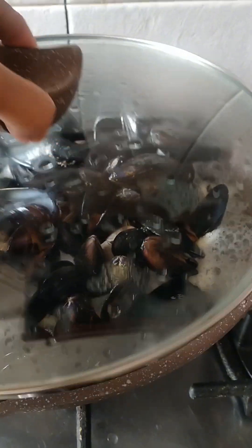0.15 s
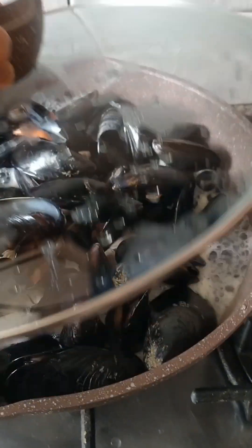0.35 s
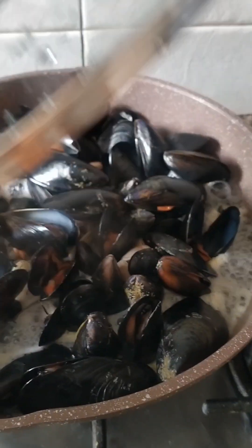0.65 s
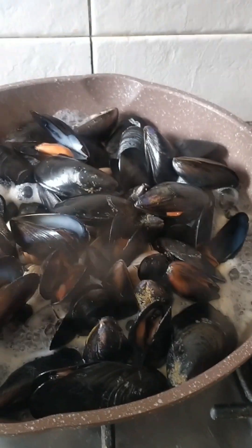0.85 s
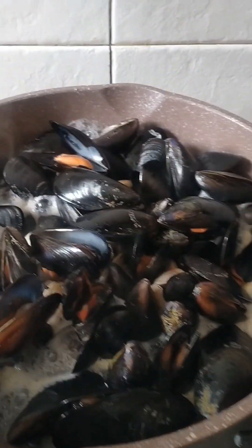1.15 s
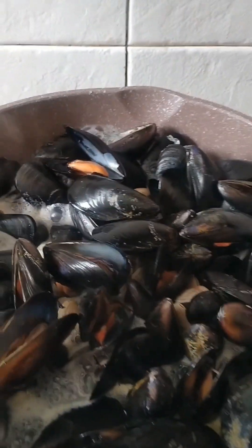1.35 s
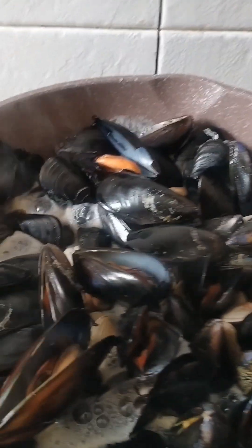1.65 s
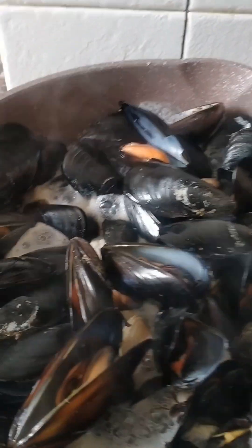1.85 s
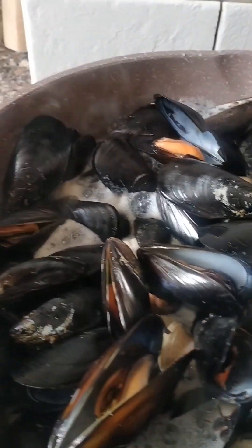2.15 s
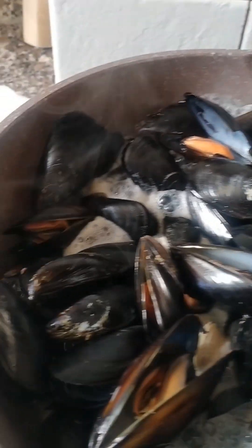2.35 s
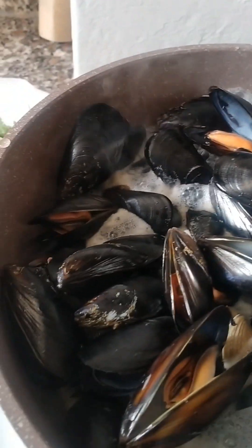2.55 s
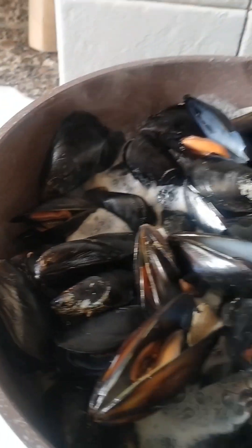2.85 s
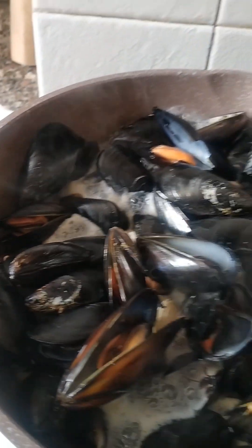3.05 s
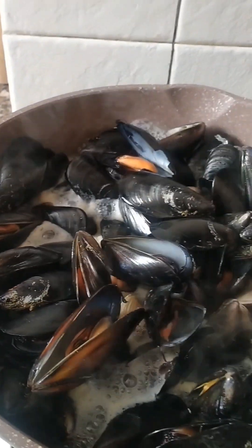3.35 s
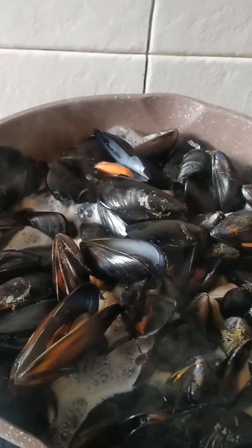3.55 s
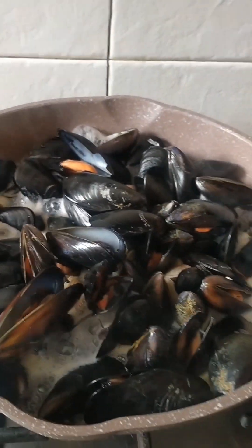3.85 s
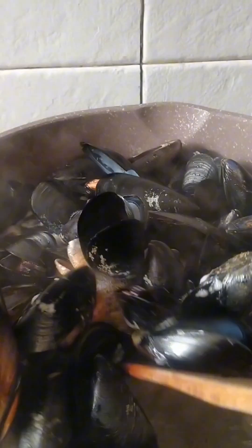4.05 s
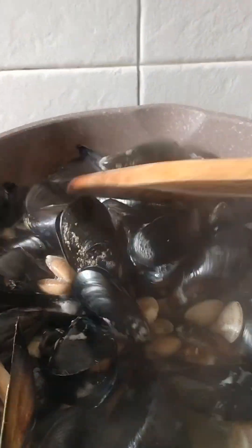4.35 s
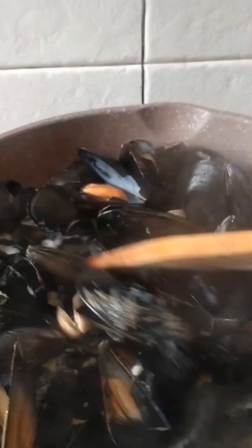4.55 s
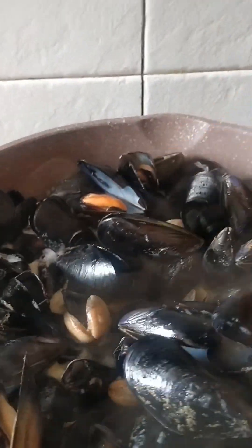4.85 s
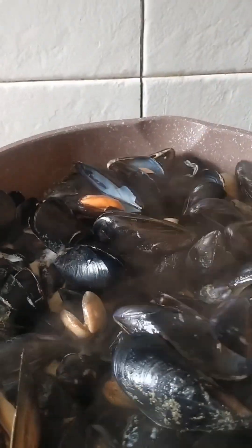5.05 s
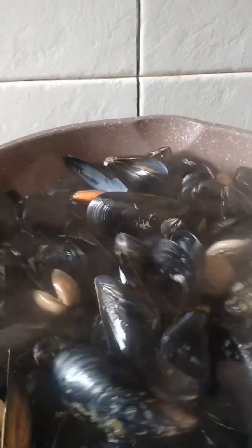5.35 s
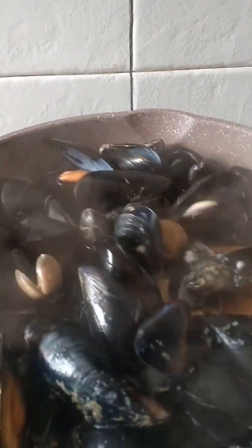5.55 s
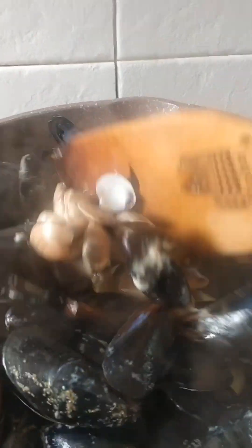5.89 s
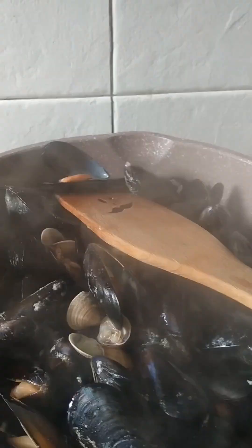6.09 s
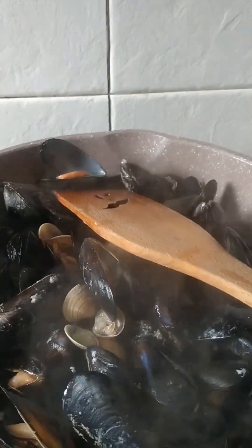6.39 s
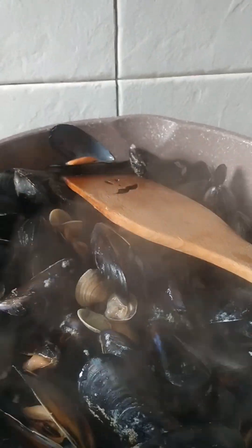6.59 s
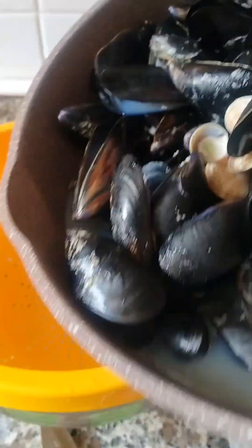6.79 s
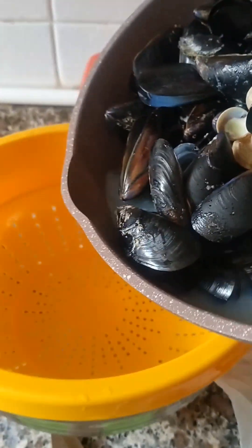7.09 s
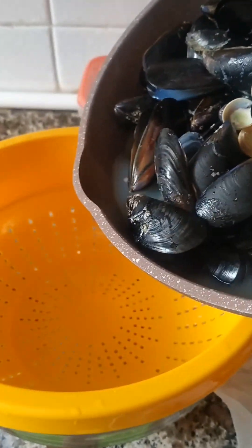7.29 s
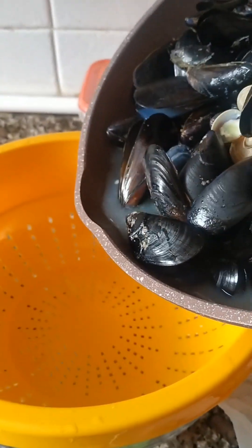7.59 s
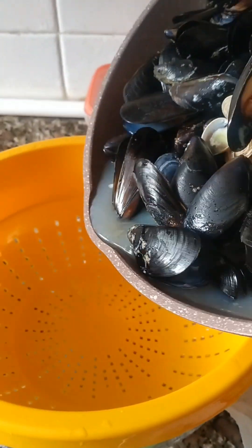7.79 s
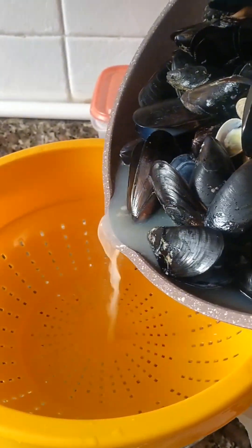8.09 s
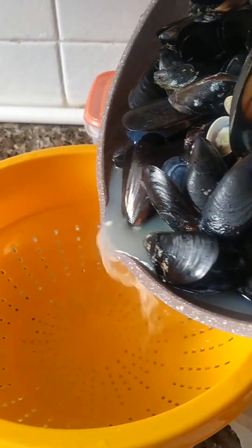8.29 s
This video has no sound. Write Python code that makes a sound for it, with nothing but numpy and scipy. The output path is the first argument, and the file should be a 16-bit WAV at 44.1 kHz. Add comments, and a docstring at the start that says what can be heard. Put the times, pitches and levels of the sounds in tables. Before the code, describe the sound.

Over a faint stove hiss, a glass lid knocks, then mussel shells clatter loudly under a spatula before a quieter pan-tilt with trickling broth.

```python
"""Over a gas flame with thin steam whistles, a lid knocks and its struck glass rings on. A spatula then turns
the shellfish in the pan: noisy blows shake a bank of short shell resonances. Abruptly the scene changes: a
quieter passage follows over room tone, then the worktop, where the pan is tilted over a colander: shells slide
and tick, the pan knocks, two thin squeaks pass, and the first broth dribbles out as ringing bubbles and
pattering drops. Noise echoes stand for the tiled kitchen."""
import sys
import numpy as np
from scipy import signal
from scipy.fft import rfft, irfft, next_fast_len
from scipy.io import wavfile

SR = 44100
rng = np.random.default_rng(int(sys.argv[2]) if len(sys.argv) > 2 else 0)


def bounce(signal):
    """Save signal as a 16-bit WAV file at the path given by the first command-line argument."""
    frames = np.transpose(np.atleast_2d(signal))
    limited = np.clip(frames, -1, 1)
    pcm = np.round(limited * 32767).astype(np.int16)
    wavfile.write(sys.argv[1], SR, pcm)


N = 371763

JUMP_S = 6.12   # the scene changes: the part with the flame ends and the quieter part begins
KITCHEN_T60_S, WALL_CUT_HZ = .24, 5000
CUTOFF_HZ = 16984   # everything above is removed
EDGE_DB = -16.5   # a slide's level at both ends of its swell and fade, relative to its loudest
LOOSENED_DB, SETTLE_S = -26.5, .25   # a blow leaves its neighbours rattling: level under the blow, t60

# The stove's background layers: start_s, gas_hiss_db, room_rumble_db, handling_rumble_db
STOVE_LEVELS = [(0.15, -54.5, -55.5, -77), (0.6, -53.5, -56, -94), (2.5, -53.5, -56, -82),
                (2.75, -52.5, -51, -73), (3.2, -53, -56.5, -59.5), (3.45, -53.5, -49, -52),
                (3.7, -54, -55.5, -65.5), (4.0, -54.5, -57, -63.5), (4.81, -65, -57, -84)]
# Spectrum of the gas hiss: frequency_hz, density_db (per Hz, relative)
HISS_SPECTRUM = [(350, -22), (600, -13), (1680, 6), (2980, -7.5), (7800, -9.5), (10200, -13), (10900, -7.5),
                 (15000, 1.5), (16100, 11), (16800, -57.5)]
# Burner resonances in the hiss: frequency_hz, width_hz, boost_db
BURNER_PEAKS = [(1686, 36, 6), (3620, 160, 8.5), (5770, 540, 5), (7640, 680, 6), (11130, 330, 11)]
# Steam whistles: pitch_hz, level_db (over the hiss)
STEAM_WHISTLES = [(1850, -15.5), (5040, -18), (8650, -27), (13500, -14.5), (14900, -9), (15400, -10.5)]
# Spectrum of the room: frequency_hz, density_db (per Hz, relative)
ROOM_SPECTRUM = [(12, -47.5), (20, -2.5), (75, -7.5), (125, -1), (252, -13.5), (299, -10), (325, -11.5),
                 (848, -16), (1330, -19), (2690, -23.5), (5440, -43.5), (15000, -37.5), (16800, -54)]
# Room tone once the hiss has stopped: start_s, level_db
QUIET_ROOM_LEVELS = [(6.2, -63.5), (6.5, -64), (6.6, -60), (7.3, -59.5), (8.43, -56.5)]
# Broth dribbling through the holes: start_s, gurgle_db
BROTH_LEVELS = [(7.99, -92), (8.03, -61.5), (8.43, -59)]
# Thin squeaks: start_s, length_s, pitch_hz, level_db
SQUEAK_EVENTS = [(7.53, .08, 11600, -58), (7.63, .08, 13200, -57)]
# Things knocked: start_s, thud_db, thud_hz, then over the thud clank_db, crack_db, ring_db; body whose modes
# ring (lid or pan); the two 100 Hz rows are low bumps as the pan is handled
KNOCK_EVENTS = [(0.059, -25.5, 405, -6.5, -31, -20, "lid"), (0.191, -59, 330, 7, 7, 9, "lid"),
                (1.348, -54, 890, 18.5, -10, -2, "lid"), (2.681, -35, 465, 1.5, -3.5, -11, "lid"),
                (3.159, -38, 294, -16, -4, -20, "lid"), (3.392, -19.5, 524, -7, -41, -24, "lid"),
                (3.561, -32, 312, -2.5, -39, -28, "lid"), (4.8425, -23.5, 517, 1, -22, 0.5, "pan"),
                (6.552, -43, 100, -30, -32, -33, "pan"), (6.893, -43, 100, -11, -23, -30, "pan"),
                (7.452, -34, 354, 1.5, -38.5, -31, "pan"), (8.018, -34.5, 443, -9, -21, -33, "pan"),
                (8.056, -33, 432, -4.5, -34, -28, "pan")]
# Ringing modes of the glass lid: pitch_hz, level_db, t60_s
LID_MODES = [(2070, 1, 0.11), (2420, -0.5, 0.17), (3000, -8.5, 0.15), (3600, -20, 0.18)]
# Ringing modes of the pan: pitch_hz, level_db, t60_s
PAN_MODES = [(178, -19, .4), (1394, -1, .11), (1992, -3, .06), (2110, -9, .1), (2450, -7, .1),
             (2650, -9, .07), (3305, -2, .15), (3672, -6, .15)]
# The heap shifts under spatula or tilt: loudest_s, swell_s, fade_s, level_db, treble_db (over shell colour)
HEAP_SLIDES = [(4.048, 0.0057, 0.29, -30, -4.5), (4.25, 0.072, 0.046, -27.5, -2.5),
               (4.411, 0.16, 0.15, -19.5, -3), (4.571, 0.041, 0.1, -20, -4),
               (4.965, 0.055, .12, -19.5, -3.5), (5.2, 0.12, 0.13, -28, -7), (5.39, 0.33, 0.18, -24, -10),
               (5.7, 0.19, 0.35, -31.5, -11), (5.938, 0.17, 0.15, -22, 1.5),
               (6.719, 0.081, 0.13, -44, -2.5), (7.2, 0.11, 0.1, -53, -3.5), (7.57, 0.12, 0.15, -40.5, -1),
               (7.84, 0.16, 0.14, -34.5, -2.5), (8.4, 0.53, 0.28, -53.5, 4.5)]
# Shell on shell blows: start_s, strike_db, loudest_pitch_hz, treble_db (over shell colour)
SHELL_BLOWS = [(4.0437, -17, 2750, 7), (4.1245, -17, 2710, 9), (4.136, -12.5, 3160, 2),
               (4.1431, -13, 1360, 5), (4.1958, -19, 2760, 9), (4.2231, -10.5, 2760, 0),
               (4.3035, -7.5, 2720, 4.5), (4.3426, -8.5, 2670, -1), (4.3974, -17, 2590, -10),
               (4.4586, -5, 7640, -3), (4.5326, -11, 2600, 0), (4.5522, -7, 2620, -13),
               (4.6868, -10, 2980, 9.5), (4.8426, -5, 3200, -7), (4.9373, -5.5, 5810, -3),
               (4.9488, -19, 3030, 16), (4.96, -23, 2630, -6), (4.9911, -10, 3060, -17),
               (5.035, -9, 2900, 2), (5.1143, -17.5, 2550, 7), (5.2497, -26, 2540, 13),
               (5.2651, -14, 2700, -2), (5.6268, -16, 2430, -29), (5.6424, -20.5, 3060, -16),
               (5.6689, -14, 2530, -11), (5.7474, -18, 2500, 1), (5.7593, -16.5, 2710, -7),
               (5.8135, -8, 2820, -2), (5.865, -9.5, 4920, -1), (5.8837, -15, 2820, -2),
               (5.9555, -7, 3770, -6), (6.0355, -11.5, 3200, 2), (6.0643, -13, 2260, -2),
               (6.6472, -38, 3020, -6), (7.0565, -44.5, 2430, 0), (7.0994, -50, 1540, 3),
               (7.1464, -47.5, 2920, 0), (7.4954, -35, 2320, -13), (7.5599, -26.5, 1470, 9),
               (7.6953, -29, 3770, 5), (7.8118, -25, 2600, -11), (7.884, -26, 2700, 2),
               (7.9066, -25, 3000, -2), (7.946, -19, 3000, -6), (7.9845, -24, 2680, 1),
               (8.1885, -32.5, 2160, -8), (8.3448, -35, 2460, -16)]
# Usual shell colour: frequency_hz, density_db (per Hz, relative)
SHELL_COLOUR = [(120, -55), (200, -20.5), (301, -10.5), (534, -15), (597, -10), (680, -14.5), (915, -9),
                (1720, -8.5), (2580, -0.5), (5320, -11), (7710, -10), (9630, -22.5), (15000, -9.5),
                (16800, -41.5)]
# Fuller colour of shells sliding on the pan floor, used after the jump: frequency_hz, change_db
TILTED_COLOUR = [(400, -1.5), (1100, 6.5), (2600, 0), (5500, -7), (7600, -2)]


def from_db(db):
    """Gain of a level in dB."""
    return 10 ** (np.asarray(db) / 20)


def rms_one(x):
    """Scale to unit rms."""
    return x / np.sqrt(np.mean(x ** 2) + 1e-20)


def in_time(rows):
    """Draw each column of a level curve sample by sample."""
    s, *columns = np.transpose(rows)
    return [np.interp(np.arange(N) / SR, s, column) for column in columns]


def at_hz(points, hz):
    """Read a spectrum on a log-frequency axis."""
    points = np.array(points)
    return np.interp(np.log(hz), np.log(points[:, 0]), points[:, 1])


def band(x, low_hz, high_hz):
    """Band-pass."""
    return signal.sosfilt(signal.butter(2, [low_hz, high_hz], "band", fs=SR, output="sos"), x)


def drift(rate_hz):
    """Slow random wander of rms 1: low-passed noise made at a fortieth of the sample rate."""
    r = np.exp(-80 * np.pi * rate_hz / SR)
    noise = rng.standard_normal(N // 40 + 2002)
    slow = signal.lfilter([1], [1, -2 * r, r * r], noise)[2000:]   # skip the filter's start
    return np.interp(np.arange(N) / 40, np.arange(len(slow)), rms_one(slow))


def ring(clicks, hz, t60_s):
    """A resonator: a unit click sets a dying sine of height 1 ringing."""
    r, w = from_db(-60 / (t60_s * SR)), 2 * np.pi * hz / SR
    return signal.lfilter([0, np.sin(w)], [1, -2 * r * np.cos(w), r * r], clicks + 1e-18)


def dying(clicks, t60_s):
    """Envelope that jumps at each click and dies away exponentially."""
    return signal.lfilter([1], [1, -from_db(-60 / (t60_s * SR))], clicks + 1e-18)


def coloured(spectrum, peaks=()):
    """Steady noise with a given spectrum and resonant peaks; rms 1."""
    size = next_fast_len(N)
    hz = np.maximum(np.arange(size // 2 + 1) * SR / size, 1)
    level_db = at_hz(spectrum, hz)
    for peak_hz, width_hz, boost_db in peaks:
        level_db = level_db + boost_db / (1 + (2 * (hz - peak_hz) / width_hz) ** 2)
    return rms_one(irfft(rfft(rng.standard_normal(size)) * from_db(level_db), size)[:N])


def quiet_room_tone():
    """The room without the flame: coloured noise with a wandering level."""
    return from_db(in_time(QUIET_ROOM_LEVELS)[0] + drift(6.2)) * coloured(ROOM_SPECTRUM)


def steam_whistles(half_width_hz, wander):
    """Narrow noise bands whose pitch and strength wander slowly."""
    out = np.zeros(N)
    for hz, level_db in STEAM_WHISTLES:
        phase = np.cumsum(2 * np.pi * hz / SR * (1 + wander * drift(0.85)))
        # slow noise on a carrier spreads to both sides of its pitch
        narrow = rms_one(band(rng.standard_normal(N), 5.4, half_width_hz))
        out += from_db(level_db + 3 * drift(1.2)) * narrow * np.cos(phase)
    return out


def stove_background():
    """Flickering gas hiss with burner resonances and steam, over room rumble and low handling rumble."""
    hiss_db, rumble_db, handling_db = in_time(STOVE_LEVELS)
    gas = coloured(HISS_SPECTRUM, BURNER_PEAKS) + steam_whistles(half_width_hz=130, wander=0.0081)
    out = from_db(hiss_db + 1.1 * drift(8.9)) * gas
    room = coloured(ROOM_SPECTRUM, [(112, 25, 2.4), (300, 73, 4.4)])   # two low bands stand out
    out += from_db(rumble_db + drift(3.9)) * room
    return out + from_db(handling_db) * rms_one(band(rng.standard_normal(N), 12, 57))


def kitchen(x):
    """Dense echoes off the tiles: a dying, dulled noise as the room's answer."""
    t = np.arange(SR // 2) / SR
    tail = rng.standard_normal(len(t)) * from_db(-60 * t / KITCHEN_T60_S)
    tail = band(tail * (t > .004), 72, WALL_CUT_HZ)   # first echo after 4 ms
    return signal.fftconvolve(x, tail / np.sqrt(np.sum(tail ** 2)))[:len(x)]


def squeaks(t60_s):
    """Brief thin whistles: noise in a narrow resonance under a swell."""
    t, out = np.arange(N) / SR, np.zeros(N)
    for s, length_s, hz, level_db in SQUEAK_EVENTS:
        swell = np.sin(np.pi * np.clip((t - s) / length_s, 0, 1)) ** 2
        out += from_db(level_db) * swell * rms_one(ring(rng.standard_normal(N), hz, t60_s))
    return out


def random_bursts(per_s, spread_db, limit):
    """Clicks at random moments, with random strengths capped at the limit times the spread."""
    strength = from_db(spread_db * np.minimum(rng.exponential(1, N), limit))
    return strength * (rng.random(N) < per_s / SR)


def gurgle(bubbles_per_s, turns, splash_db):
    """Big bubbles burst at random and ring some cycles; droplets patter on the plastic, higher in pitch."""
    bubbles = random_bursts(bubbles_per_s, 3.3, 4)
    size_class = rng.integers(0, 8, N)
    rings = np.zeros(N)
    for k, hz in enumerate(np.geomspace(330, 620, 8)):
        rings += ring(bubbles * (size_class == k), hz, turns / hz)   # 60 dB down after these turns
    drops = random_bursts(250, 3.6, 4)
    patter = band(dying(drops, 0.017) * rng.standard_normal(N), 1100, 3000)
    return from_db(in_time(BROTH_LEVELS)[0]) * (rms_one(rings) + from_db(splash_db) * rms_one(patter))


def knocks(thud_t60_s, clank_gain_db, clank_t60_s, crack_t60_s):
    """A dull thud of its own pitch, a rough clank, a crisp crack, and the lid or the pan set ringing."""
    out, clanks, cracks = np.zeros((3, N))
    for s, thud_db, hz, clank_db, crack_db, ring_db, body in KNOCK_EVENTS:
        start = round(s * SR)
        blow = np.zeros(N)
        blow[start] = from_db(thud_db)
        roughness = 0.015 * dying(blow, 0.25) * rng.standard_normal(N)
        out += ring(0.53 * blow + roughness, hz, thud_t60_s)
        clanks += blow * from_db(clank_db)
        cracks += blow * from_db(crack_db)
        at = slice(start, start + SR // 2)
        for mode_hz, level_db, t60_s in {"lid": LID_MODES, "pan": PAN_MODES}[body]:
            mode_db = ring_db + level_db + rng.normal(0, 0.79)   # no two knocks ring alike
            out[at] += from_db(mode_db) * ring(blow[at], mode_hz, t60_s)
    clank_noise = dying(clanks, clank_t60_s) * rng.standard_normal(N)
    out += from_db(clank_gain_db) * band(clank_noise, 410, 2200)
    return out + band(dying(cracks, crack_t60_s) * rng.standard_normal(N), 3100, 7100)


def sliding():
    """Level and treble of the moving heap in dB: the slides, and the rattle left by each blow."""
    t, loose = np.arange(N) / SR, np.zeros(N)
    for s, strike_db, *_ in SHELL_BLOWS:
        loose[round(s * SR)] = from_db(strike_db + LOOSENED_DB) ** 2
    later = t > JUMP_S
    power = dying(loose, SETTLE_S / 2)   # half the time, because power is the square of level
    power[later] = dying(loose[later], SETTLE_S / 2)   # the rattle does not cross the jump
    slides = []
    for s, swell_s, fade_s, level_db, _ in HEAP_SLIDES:
        away = np.where(t < s, (s - t) / swell_s, (t - s) / fade_s)
        same_part = later == (s > JUMP_S)
        slides.append(from_db(level_db + EDGE_DB * away) ** 2 * same_part)
    slides = np.array(slides) + 1e-30
    total = slides.sum(axis=0)
    treble_db = np.array(HEAP_SLIDES)[:, -1] @ slides / total   # the louder slide weighs more
    return 10 * np.log10(power + total), treble_db


def shells(count, per_s, spread_db, tick_t60_s, blow_t60_s, width, rub_db, own_db, blow_db, snap):
    """Rough contacts shake a bank of short shell resonances: steady rubbing, a random rattle, single blows."""
    level_db, treble_db = sliding()
    ticks = np.flatnonzero(rng.random(N) < per_s / SR)
    tick_db = level_db[ticks] + spread_db * (np.minimum(rng.exponential(1, len(ticks)), 3.0) - 2)
    tick_hz = 3000 * 2 ** rng.normal(0, 0.4, len(ticks))   # every shell has its own colour
    s, strike_db, pitch_hz, edge_db = np.transpose(SHELL_BLOWS)
    at = np.round(s * SR).astype(int)
    chance_db = rng.normal(0, 0.25, (len(s), count))
    rub = from_db(level_db + rub_db + 2 * drift(27))
    rough = rng.standard_normal((4, N))   # neighbouring resonances are shaken by unrelated roughness
    out, after_jump = np.zeros(N), (np.arange(N) > JUMP_S * SR).astype(int)
    for k, hz in enumerate(np.geomspace(260, 16000, count)):
        blows, rattle = np.zeros((2, N))
        thin = np.clip(np.log2(hz / 6500) * 2, 0, 1)   # thin edges hiss more or less as the shells turn
        edge_gain = from_db(thin * treble_db)
        own_pitch_db = own_db * np.exp(-(np.log2(hz / pitch_hz) / 0.7) ** 2)
        blows[at] = from_db(strike_db + blow_db + own_pitch_db + chance_db[:, k] + thin * edge_db)
        rattle[ticks] = from_db(tick_db + 11.4 * np.exp(-(np.log2(hz / tick_hz) / 0.16) ** 2))
        shake = dying(blows, blow_t60_s) + (dying(rattle, tick_t60_s) + rub) * edge_gain
        clicks = snap * (blows + rattle * edge_gain)
        part_db = np.array([0, at_hz(TILTED_COLOUR, hz)])   # before and after the jump
        colour = from_db(at_hz(SHELL_COLOUR, min(hz, 15000)) + 4.0 + part_db)[after_jump]
        out += colour * band(shake * rough[k % 4] + clicks, hz / width, hz * width)
    t = np.arange(SR // 20) / SR
    for i, db, hz in zip(at, strike_db, pitch_hz):   # the struck shell sings briefly at its own pitch
        out[i:i + len(t)] += from_db(db - 10.5 - 60 * t / 0.047) * np.sin(2 * np.pi * hz * t)
    return out


def scene():
    """The part with the flame's hiss, then the quieter part; each keeps its own echoes."""
    with_flame = np.clip((JUMP_S - np.arange(N) / SR) / 0.0036, 0, 1)   # fades in the last 3.6 ms
    near = gurgle(bubbles_per_s=40, turns=22.0, splash_db=0.5)
    near += knocks(thud_t60_s=0.039, clank_gain_db=1.5, clank_t60_s=0.13, crack_t60_s=0.096)
    near += shells(count=34, per_s=600, spread_db=4.5, tick_t60_s=0.0089, blow_t60_s=0.02, width=1.06,
                   rub_db=-3.0, own_db=11, blow_db=-8.0, snap=4.5)
    wet = from_db(-13)
    first = with_flame * (stove_background() + near + wet * kitchen(near * with_flame))
    later = near * (with_flame == 0)
    later += wet * kitchen(later) + (1 - with_flame) * quiet_room_tone()
    return (first + later + squeaks(t60_s=0.006))[None]


def record(dry):
    """Weakens the highest treble, then removes everything above the cutoff."""
    weaken = signal.ellip(5, .5, 18, 15620, fs=SR, output="sos")
    cut = signal.cheby2(14, 60, CUTOFF_HZ, fs=SR, output="sos")
    return signal.sosfilt(np.vstack([weaken, cut]), dry)


dry = scene()
out = record(dry)
bounce(out)
```